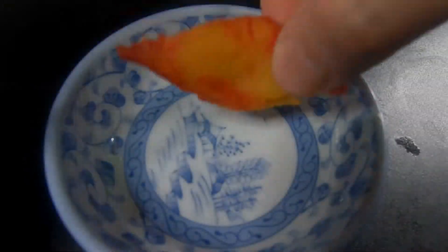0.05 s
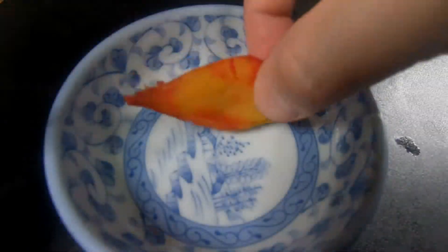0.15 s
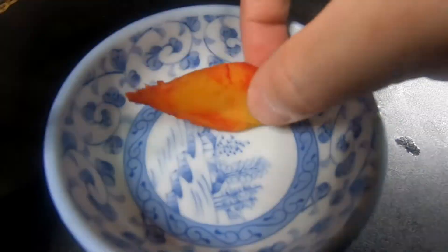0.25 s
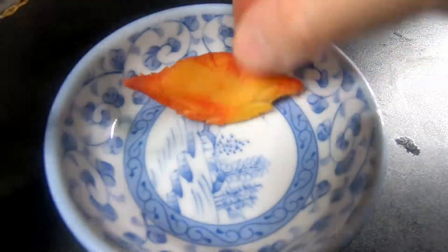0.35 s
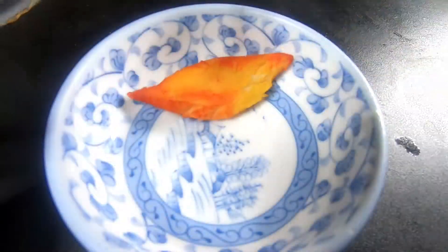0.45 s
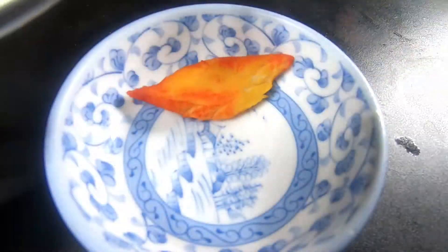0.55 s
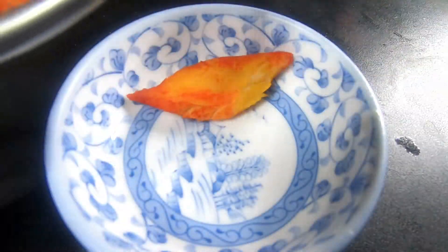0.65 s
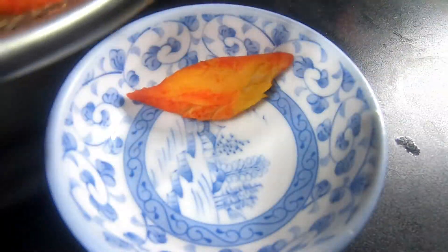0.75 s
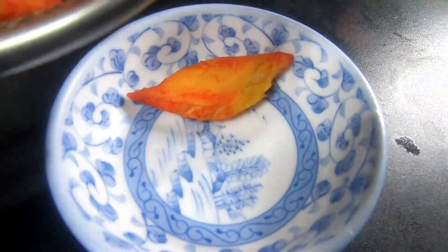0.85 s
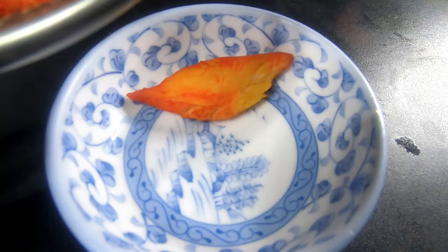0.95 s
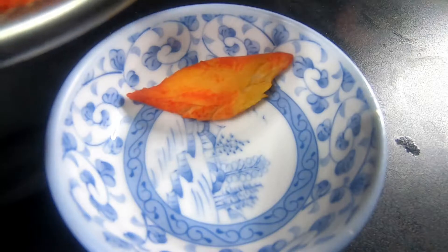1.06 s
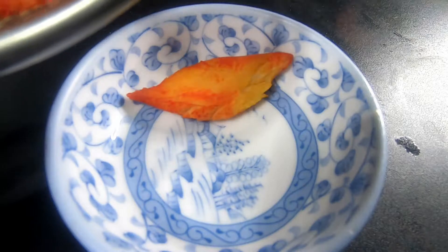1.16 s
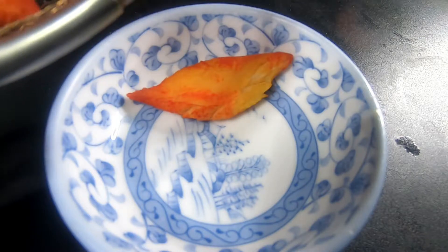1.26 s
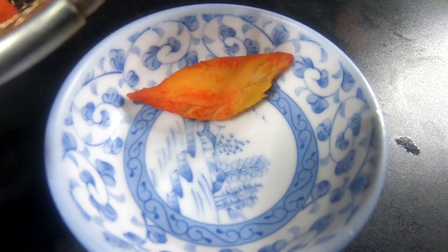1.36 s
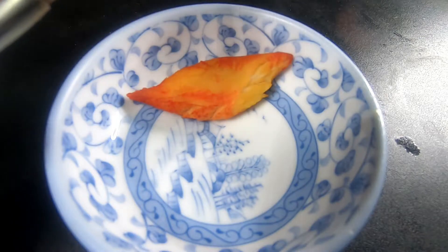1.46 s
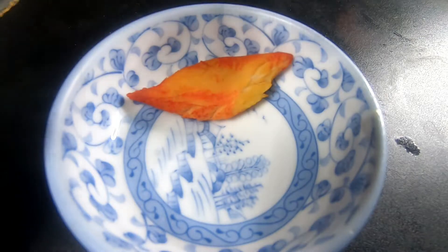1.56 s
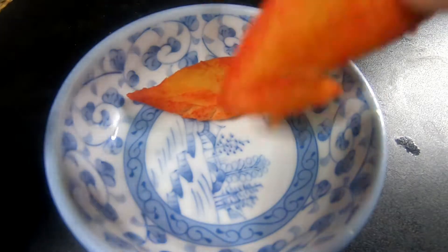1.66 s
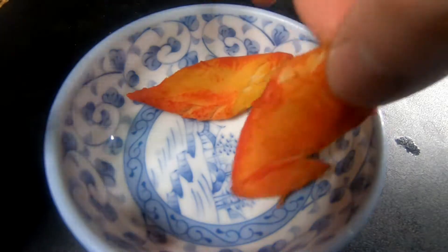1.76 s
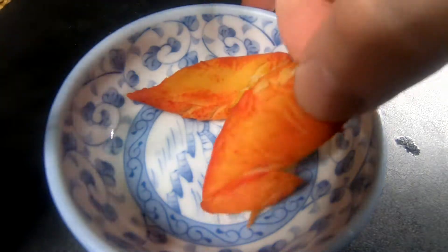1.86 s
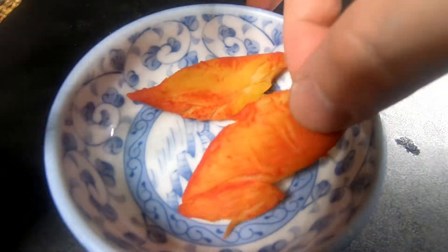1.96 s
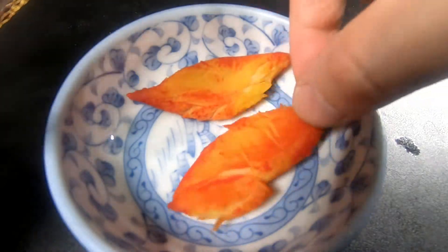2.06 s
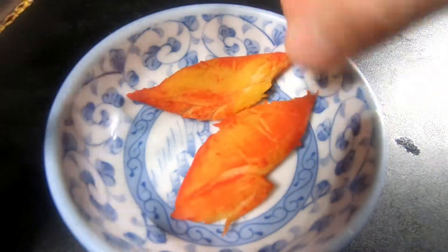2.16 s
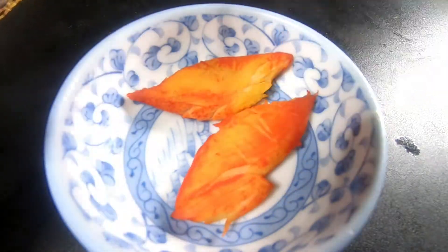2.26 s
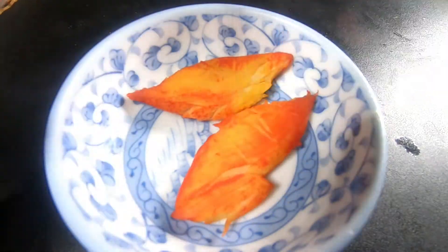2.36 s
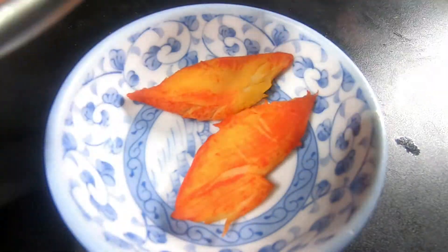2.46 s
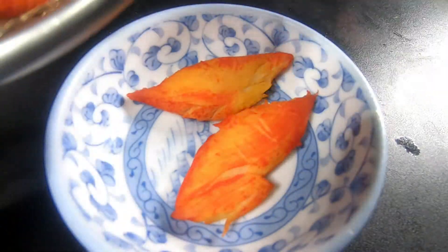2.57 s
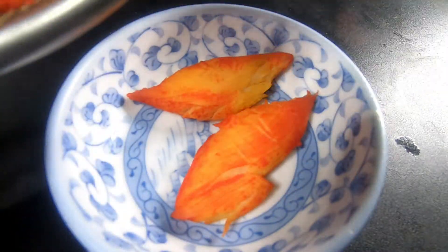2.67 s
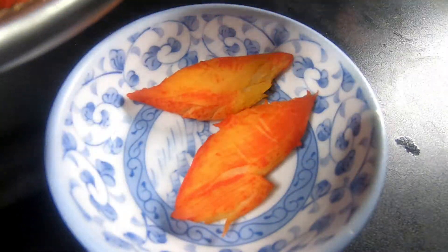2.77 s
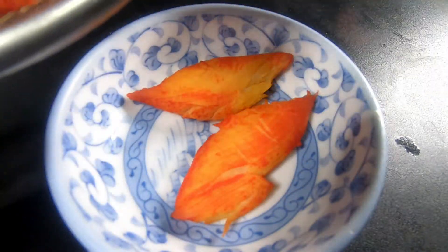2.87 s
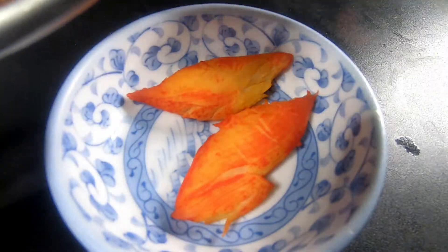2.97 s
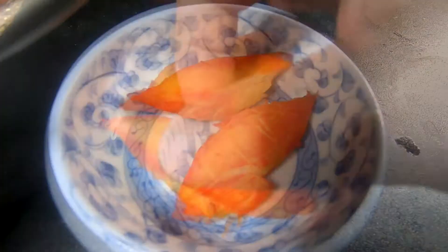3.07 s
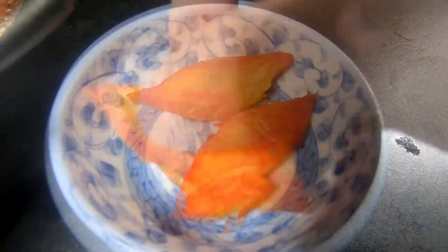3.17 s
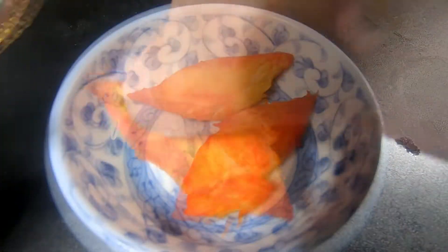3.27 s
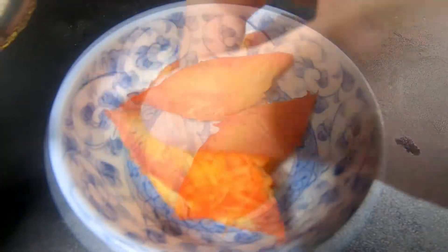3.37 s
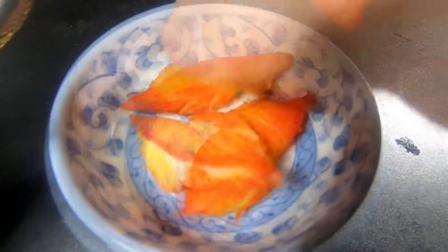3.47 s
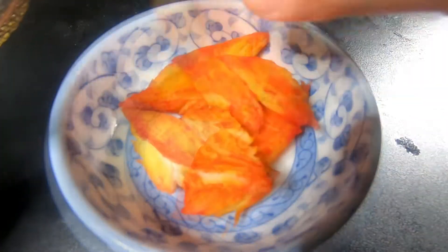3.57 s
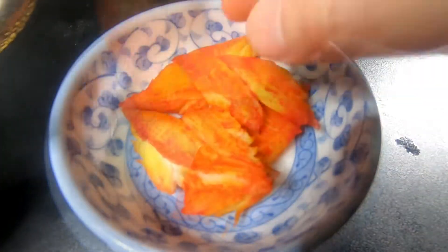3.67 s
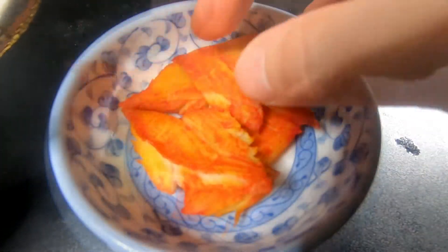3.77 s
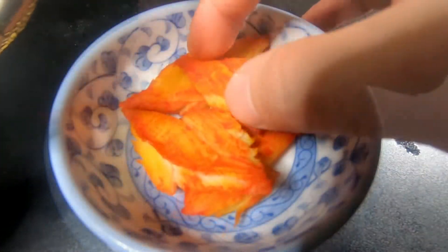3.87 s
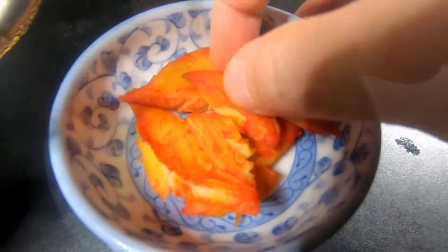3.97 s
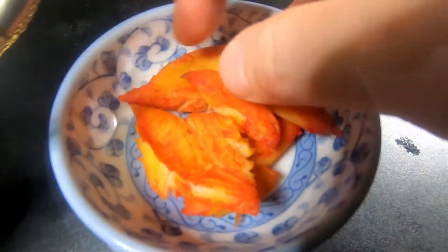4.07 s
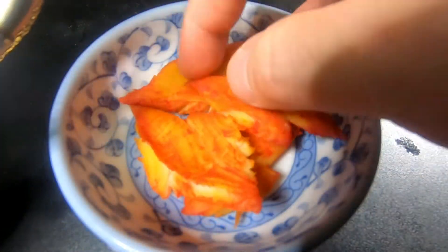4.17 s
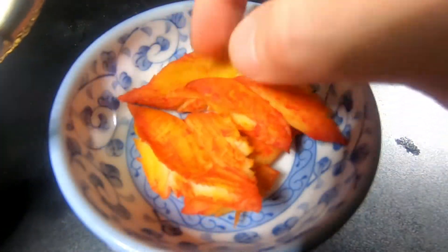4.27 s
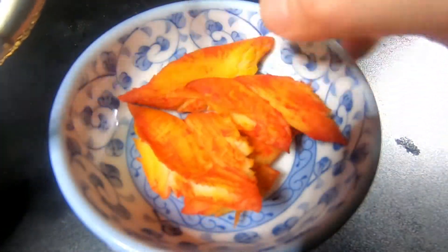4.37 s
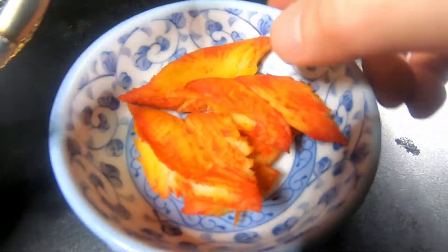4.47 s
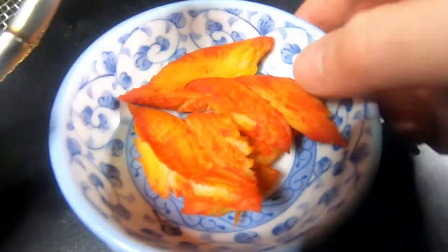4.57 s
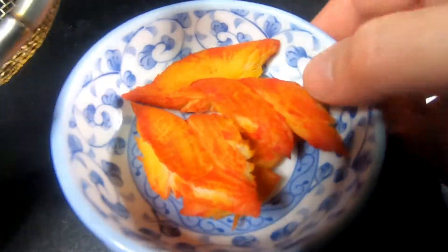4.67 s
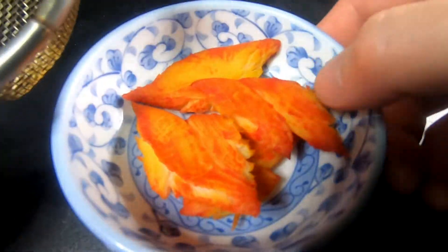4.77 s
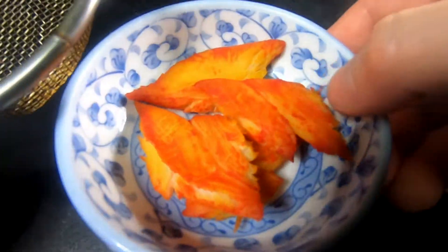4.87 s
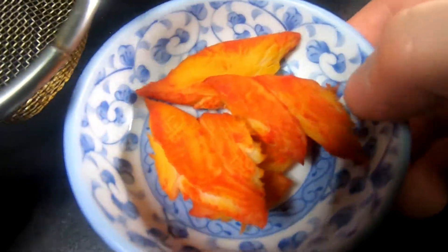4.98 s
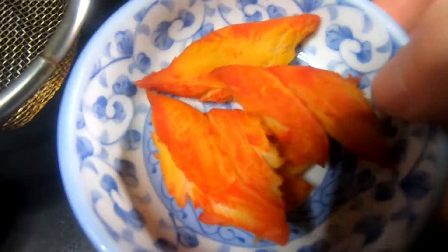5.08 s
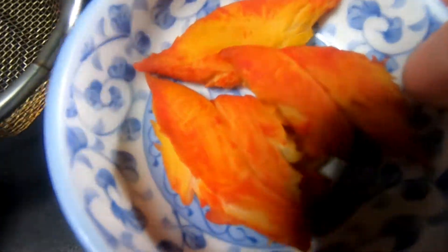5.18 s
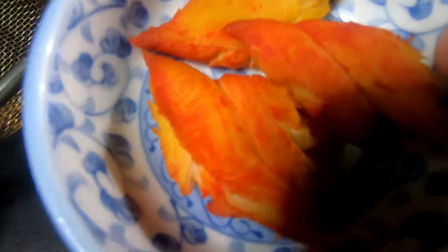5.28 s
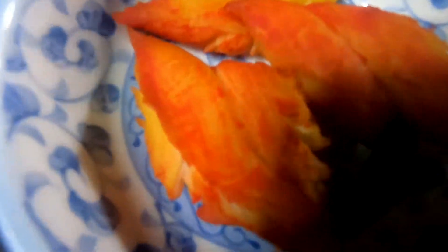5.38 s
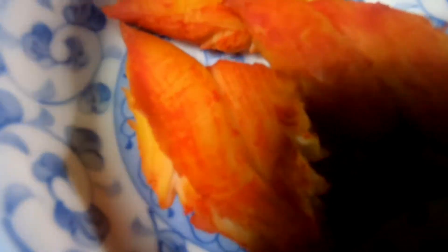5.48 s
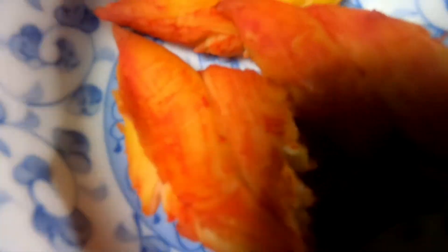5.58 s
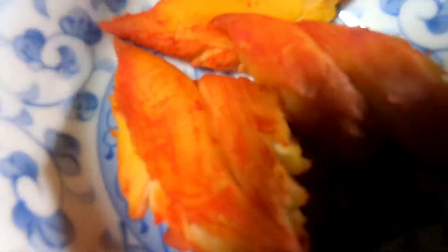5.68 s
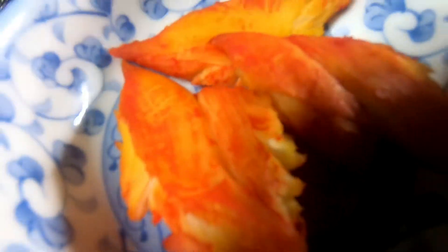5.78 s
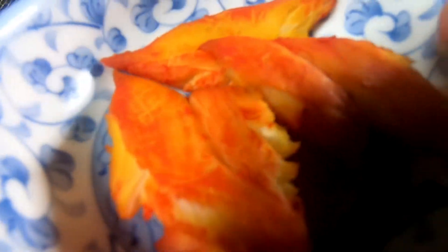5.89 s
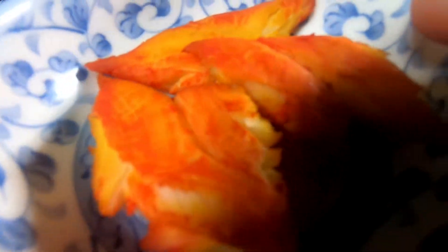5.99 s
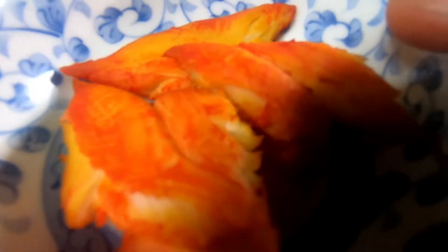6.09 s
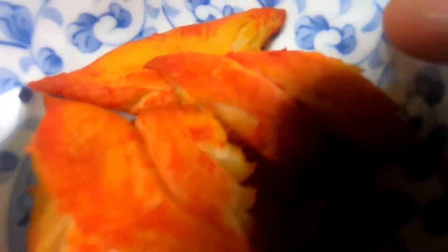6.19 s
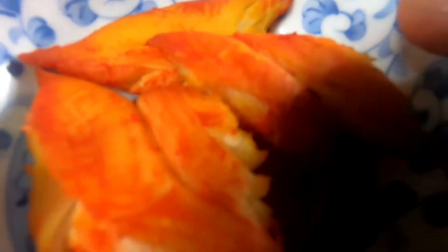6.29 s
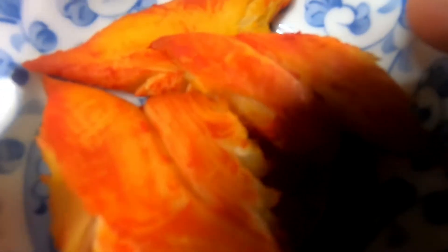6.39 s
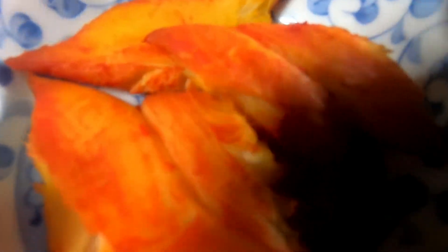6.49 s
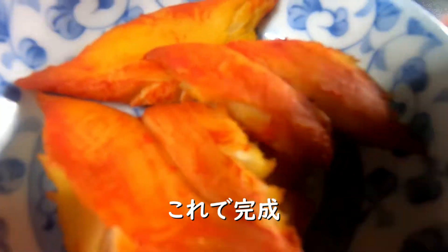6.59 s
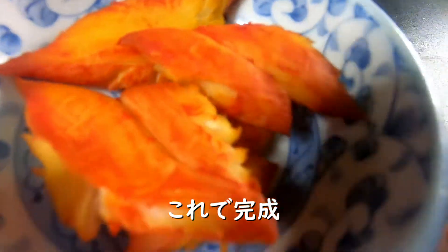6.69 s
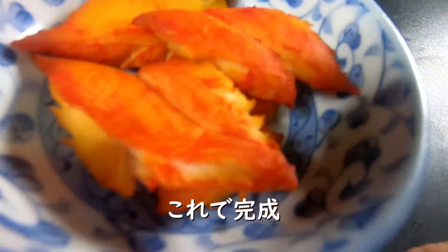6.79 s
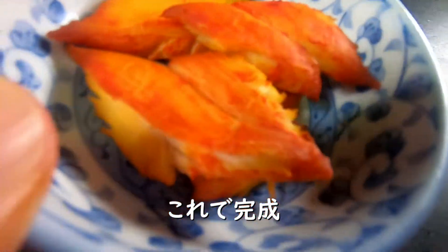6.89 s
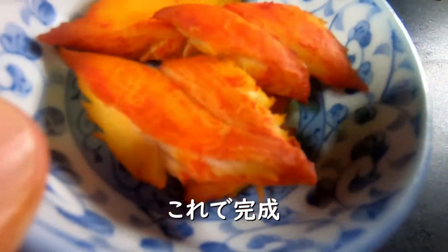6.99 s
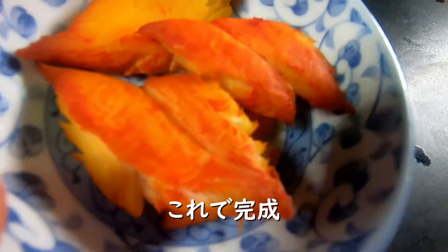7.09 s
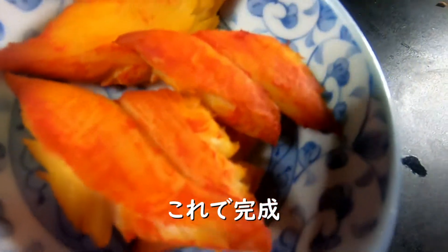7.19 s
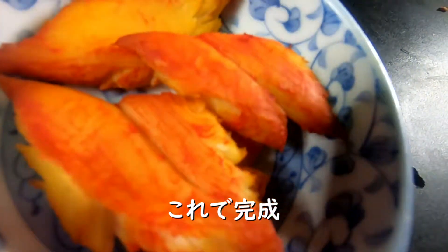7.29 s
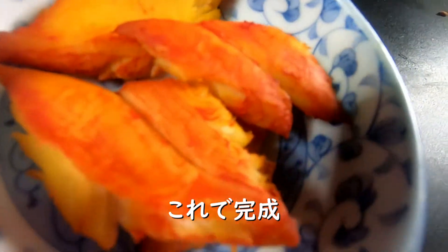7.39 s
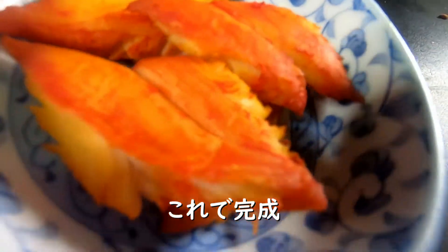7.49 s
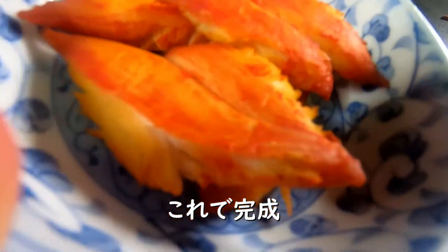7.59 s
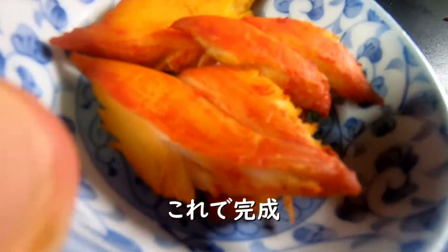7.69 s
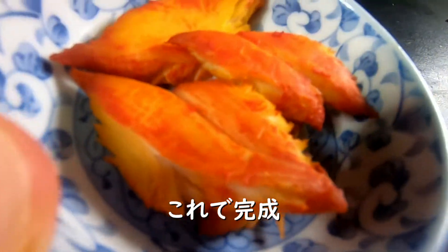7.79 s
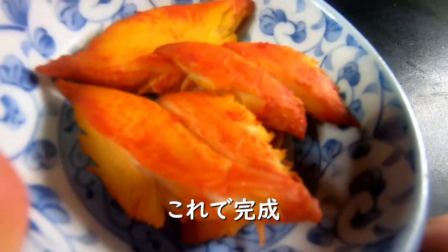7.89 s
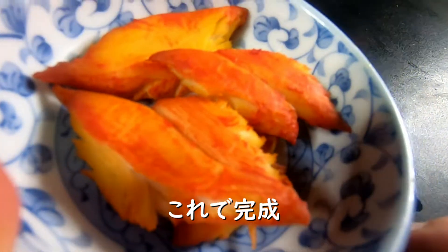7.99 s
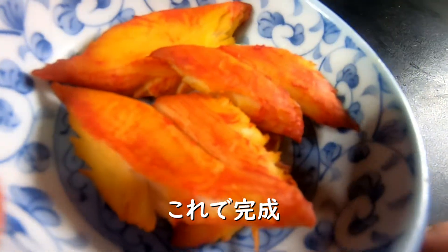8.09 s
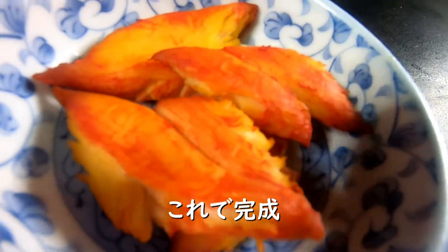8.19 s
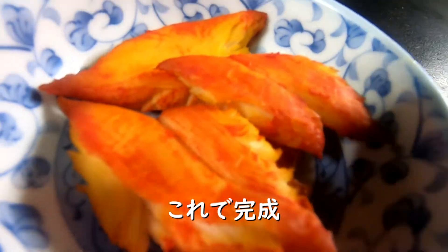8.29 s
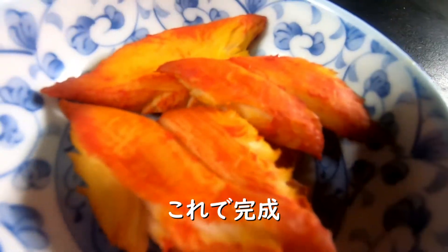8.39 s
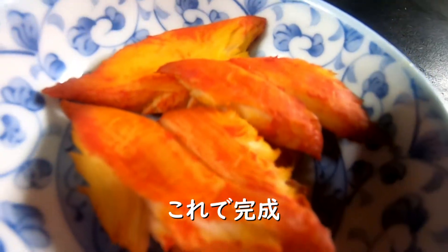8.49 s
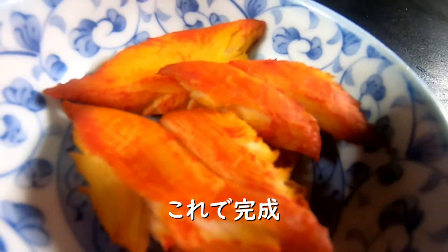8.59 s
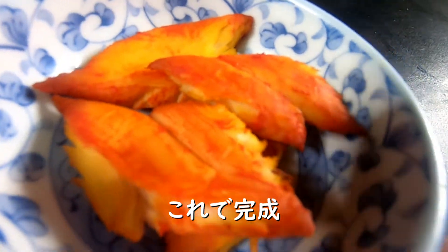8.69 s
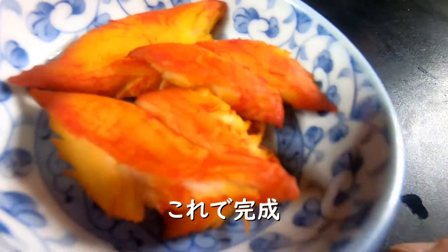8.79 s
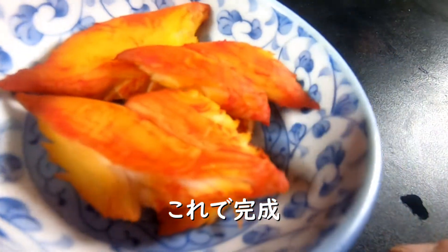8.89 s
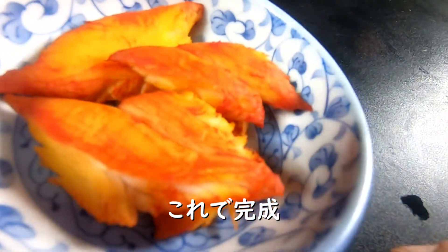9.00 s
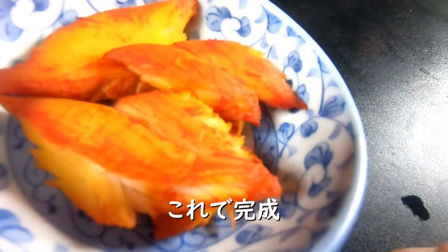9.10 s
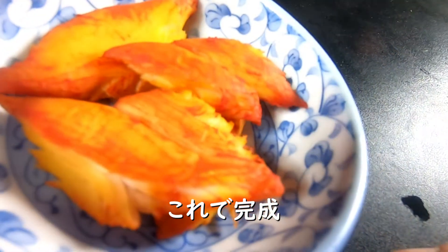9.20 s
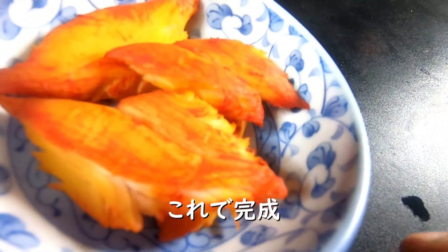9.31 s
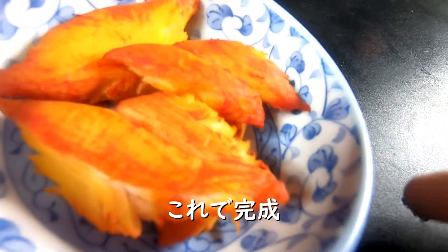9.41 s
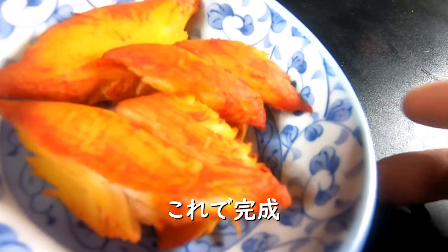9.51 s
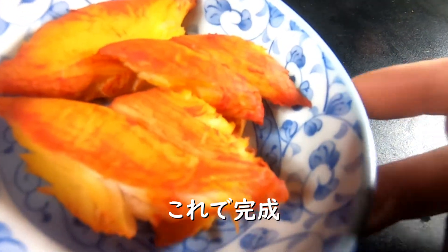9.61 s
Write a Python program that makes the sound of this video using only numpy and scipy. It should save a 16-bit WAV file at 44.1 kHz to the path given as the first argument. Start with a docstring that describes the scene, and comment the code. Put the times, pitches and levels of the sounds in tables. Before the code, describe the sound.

Quiet humming kitchen: muffled food thumps, faint bowl rings and focus-motor whirrs, then close handling knocks, rubs and one heavy bump before near stillness.

```python
"""Kitchen counter, close stereo pair on a hand-held camera, quiet humming room behind.
From the start soft food is laid by hand in a porcelain bowl: dull thumps from decaying notes, with brief focus-motor
whirrs, wet squelches of noise crackle and faint porcelain rings between them. From about 5 s fingers knock and slide
on the casing, whose modes ring near 1.2 kHz, hardest at 7 s, and rock the two microphones against each other.
The room turns duller and louder, the image closes to the centre, then opens again for a last soft blow at 9.5 s."""
import sys
import numpy as np
from scipy import signal
from scipy.fft import rfft, irfft
from scipy.io import wavfile

SR = 44100
rng = np.random.default_rng(int(sys.argv[2]) if len(sys.argv) > 2 else 0)


def digitize_waveform(pressure):
    """Quantize a signal to 16-bit integers and store it at the path in sys.argv[1].

    Rows of a 2-D input are taken as channels; values are limited to [-1, 1].
    """
    field = np.atleast_2d(pressure).T
    bounded = np.clip(field, -1, 1)
    quanta = np.round(bounded * 32767).astype(np.int16)
    wavfile.write(sys.argv[1], SR, quanta)


N = 425565
TIME = np.arange(N) / SR  # s, the whole scene
AGE = np.arange(SR // 3) / SR  # s, since the start of one short sound

# ringing modes of the camera casing: [f/Hz, width/Hz, in-phase level/dB, opposite-phase level/dB]
CASING_MODES = [(505, 39, 1.5, 2), (692, 70, -7.5, -13), (808, 110, -2.5, 4), (1058, 45, -1, 16.5),
                (1202, 68, 4, 15), (1446, 110, 0.5, 5.5), (1590, 95, -1.5, -12), (1756, 42, 0, -1.5),
                (1842, 25, -1, -0.5), (1900, 40, 0, -11.5), (2030, 99, -1.5, -9), (2286, 37, -1.5, -24),
                (2442, 63, -3, -4.5), (2884, 80, -5.5, -11), (3133, 63, -3, -4), (3480, 480, -13.5, -18),
                (4160, 190, -10.5, -26.5), (4920, 630, -20, -29), (6300, 900, -32, -31)]


def undb(db):
    """Decibels to gain."""
    return 10 ** (np.asarray(db) / 20)


def unit(x):
    """Scale to rms 1."""
    return x / np.sqrt(np.mean(x ** 2))


def add(out, s, x):
    """Mix a short sound in at time s."""
    i = max(int(s * SR), 0)
    out[:, i:i + x.shape[-1]] += x[..., :N - i]


def band(x, lo_hz, hi_hz, order=2):
    """Band-pass."""
    sos = signal.butter(order, [lo_hz, min(hi_hz, SR / 2 - 1)], "band", fs=SR, output="sos")
    return signal.sosfilt(sos, x)


def stereo(mid, side):
    """Left and right microphones from the in-phase and opposite-phase parts."""
    return np.array([mid + side, mid - side])


def decay(age, t60):
    """Exponential fall by 60 dB in t60 seconds."""
    return np.exp(-np.log(1000) * age / t60)


def damped(hz, t60):
    """One freely decaying mode."""
    return np.sin(2 * np.pi * hz * AGE) * decay(AGE, t60)


def walk(rate):
    """Random wander through `rate` new values a second, spread near 1."""
    knots = rng.standard_normal(int(N / SR * rate) + 2)
    return np.interp(TIME * rate, np.arange(len(knots)), knots)


def coloured(points):
    """Noise of rms 1 with the given spectrum."""
    hz, db = np.transpose(points)
    freq = np.maximum(np.arange(N // 2 + 1) * SR / N, 1)
    gain = undb(np.interp(np.log(freq), np.log(hz), db))
    return unit(irfft(rfft(rng.standard_normal(N)) * gain, N))


def resonate(force, modes, roam_db=0, count=12):
    """A force rings the modes, with signs alternating between them; returns mid and side.
    A contact that travels drives now one mode, now another, by roam_db."""
    mid = side = 0
    place = np.linspace(0, count - 1, len(force))
    for k, (hz, width_hz, mid_db, side_db) in enumerate(modes):
        reach = undb(roam_db * np.interp(place, np.arange(count), rng.standard_normal(count)))
        ring = signal.lfilter(*signal.iirpeak(hz, hz / width_hz, fs=SR), force * reach)
        mid = mid + (-1) ** k * undb(mid_db) * ring
        side = side + (-1) ** (k // 2) * undb(side_db) * ring
    return mid, side


def slips(size, rate, spread_db):
    """Stick-slip friction: dense tiny clicks, a few much larger than the rest."""
    strength = undb(spread_db * np.minimum(rng.exponential(size=size), 4))
    return (rng.random(size) < rate / SR) * strength * rng.standard_normal(size)


def grit(force, lo_hz=4200, hi_hz=8800):
    """The thin top of a contact, from one force for each microphone; a little stronger on the right."""
    return band(force, lo_hz, hi_hz) * undb([[0], [3]])


def stroke(age, length_s, release_s, grip_share=0.097):
    """Envelope of one slide: take hold over a share of its length, slide, let go (release as t60)."""
    hold = 1 - np.exp(-age / (grip_share * length_s))
    return hold * decay(np.maximum(age - length_s, 0), release_s)


def strike(modes, grit_db, chatter_s, rock_db, soft_hz, chatter_db=-15):
    """One contact: a click and brief chatter into the modes, dulled by soft skin above soft_hz."""
    force = undb(chatter_db) * rng.standard_normal((3, len(AGE))) * np.exp(-AGE / chatter_s)
    force[:, 0] = 1  # the click
    push = signal.sosfilt(signal.butter(2, soft_hz, fs=SR, output="sos"), force[0])
    parts = (*resonate(push, modes), grit(force[1:]))
    mid, side, top = (x / np.abs(x).max() for x in parts)
    return stereo(mid, side * undb(rock_db)) + undb(grit_db) * top


def kitchen(mid_db=-68.5, side_db=-70.5, late_db=-63.5, waver_db=1.5, turn_s=(6.0, 7.8)):
    """Room air as shaped noise with a low, wavering hum; its in-phase part turns duller and louder over turn_s."""
    # spectra of the air, in phase, in opposite phase, and late in phase: [f/Hz, relative density/dB]
    air = [(18, -38), (30, 1.5), (64, -13.5), (103, -12), (128, -12.5), (168, 5), (350, -8.5), (482, -18.5),
           (573, -21), (632, -10), (1090, -20), (2110, -22.5), (2970, -23), (6690, -29), (10700, -33.5),
           (13900, -51), (22000, -120)]
    air_side = [(18, -36.5), (30, -12), (108, -13), (152, -6.5), (261, -4), (459, -14.5), (573, -14),
                (829, -7.5), (1030, -13.5), (2900, -28), (5780, -31.5), (7390, -31), (10700, -35),
                (13900, -59.5), (22000, -120)]
    late_air = [(18, -42.5), (30, -9.5), (108, -15.5), (156, 1), (274, -2), (471, -19), (770, -13.5),
                (1030, -22.5), (1230, -21.5), (4630, -29.5), (5370, -48.5), (8350, -41), (10700, -48.5),
                (13900, -96), (22000, -120)]
    late = np.interp(TIME, turn_s, [0, 1])
    early_part = undb(mid_db) * (1 - late) * coloured(air)
    mid = early_part + undb(late_db) * late * coloured(late_air)
    hum_change = band(mid, 84, 360) * (undb(2 * waver_db * walk(5.2)) - 1)
    return stereo(mid + hum_change, undb(side_db) * coloured(air_side))


def walls(x, wet_db=-20, t60=0.24):
    """The short tail of a small room: decaying noise, different at each microphone."""
    tail = band(rng.standard_normal((2, len(AGE))), 130, 4700) * decay(AGE, t60)
    tail /= np.sqrt(np.sum(tail ** 2, axis=1, keepdims=True))
    return x + undb(wet_db) * signal.fftconvolve(x, tail, axes=1)[:, :N]


def lens(sag=0.13, flutter_db=4, tone_db=-4, whine_hz=10080, whine_db=-91, whine_fade_s=(7.5, 8.1)):
    """The focus motor whirrs, its fluttering whistle rising and falling with speed; a thin whine fades late."""
    # refocusing runs: [t/s, length/s, whirr level/dB, whistle level/dB, nominal top whistle f/Hz]
    runs = [(0.724, 0.5, -80, -78, 8850), (1.49, 0.35, -84.5, -81, 8360), (3.205, 0.47, -79, -87, 9200),
            (4.981, 0.41, -70.5, -77, 9700), (5.96, 0.41, -68, -69, 11250),
            (7.992, 0.47, -65.5, -80.5, 11030)]
    whine = unit(band(rng.standard_normal((2, N)), whine_hz * .99, whine_hz * 1.01))
    out = undb(whine_db) * whine * np.interp(TIME, whine_fade_s, [1, 0])
    for s, length_s, whirr_db, whistle_db, hz in runs:
        count = int(length_s * SR)
        speed = 1 - sag * np.linspace(-1, 1, count) ** 2
        pitch_hz = hz * speed * (1 + .011 * walk(600)[:count])
        whistle = np.sin(2 * np.pi * np.cumsum(pitch_hz) / SR)
        whistle = whistle * undb(tone_db + flutter_db * walk(39)[:count])
        whirr = unit(band(rng.standard_normal(count), 1550, 4140, order=4))
        motor = undb(whirr_db) * whirr + undb(whistle_db) * whistle
        add(out, s, motor * signal.windows.tukey(count, .5))
    return out


def squelches(spread_db=4.5):
    """Moist fibres part: tiny wet films snap in a short swell of band-passed crackle."""
    # wet partings: [t/s, length/s, level/dB, centre f/Hz]
    partings = [(0.906, 0.09, -75.5, 8400), (1.011, 0.043, -71.5, 6500), (1.327, 0.01, -72.5, 6860),
                (1.358, 0.054, -70, 6700), (1.448, 0.033, -68, 6900), (1.778, 0.01, -70, 7100),
                (2.442, 0.13, -74, 7100), (2.756, 0.11, -69.5, 8150), (2.868, 0.099, -64.5, 7900),
                (3.207, 0.012, -70, 7600), (3.241, 0.013, -64, 4630), (3.261, .007, -68, 5330),
                (4.049, 0.031, -66, 3300), (8.417, 0.05, -70.5, 3370), (8.708, 0.11, -73.5, 2945)]
    out = np.zeros((2, N))
    for s, length_s, db, hz in partings:
        count = int(length_s * SR)
        snaps = rng.standard_normal((2, count)) * undb(spread_db * rng.exponential(size=count))
        mid, side = unit(band(snaps, hz * 0.78, hz * 1.23)) * signal.windows.tukey(count, .6)
        add(out, s, undb(db) * stereo(mid, 0.93 * side))
    return out


def bowl(t60=0.12):
    """Porcelain rings faintly, damped by the food in it; the ring swells for as long as skin or food rubs it."""
    # touches and strokes of the bowl: [t/s, level/dB, contact time/s]
    contacts = [(1.893, -72, 0.0032), (2.135, -61.5, .012), (2.162, -64, .05), (4.598, -69, 0.033),
                (4.851, -61, .06), (6.315, -60, .035), (6.409, -59.5, 0.018), (6.608, -49.5, 0.064)]
    # porcelain modes: [f/Hz, peak level/dB]
    modes = [(2540, -3.5), (6080, -9.5), (9450, -19), (10550, -26)]
    out = np.zeros((2, N))
    for s, db, contact_s in contacts:
        force = rng.standard_normal(len(AGE)) * AGE * (AGE < contact_s)
        for hz, mode_db in modes:
            ring = signal.fftconvolve(force, damped(hz, t60))[:len(AGE)]
            add(out, s, undb(db + mode_db) * ring / np.abs(ring).max())
    return out


def touches(level_db=-1, grit_db=-23.0, rock_db=4, soft_hz=6000):
    """Fingers and food meet the bowl and ring the counter modes; all rock the camera alike."""
    # contacts in the bowl: [t/s, level/dB, relative treble/dB, chatter time constant/s]
    contacts = [(0.372, -47.5, 0, .018), (.429, -43, -2, 0.0054), (.450, -41.5, -8, 0.0033),
                (.518, -48, 17, 0.008), (.549, -31.5, -7, 0.0044), (.579, -40, -6, .0054),
                (.612, -44, -9, 0.003), (.638, -49.5, -15, 0.018), (2.172, -49, 17, 0.0043),
                (3.1975, -49, 12, 0.027), (3.4807, -34.5, -16, 0.0072), (3.521, -52, -4, 0.016),
                (3.614, -49, 8, 0.022), (4.111, -56, 6, 0.0051), (4.381, -39, -14, 0.0053),
                (4.420, -51.5, -6, 0.0074), (4.741, -38.5, -14, 0.031), (4.868, -53, -2, .007),
                (4.917, -33.5, 5, .004), (4.952, -30.5, -2, 0.008)]
    # counter modes under the bowl: [f/Hz, width/Hz, in-phase level/dB, opposite-phase level/dB]
    counter = [(313, 38, 12, 2), (583, 14, 6.5, 6), (704, 43, 2, 9.5), (933, 177, 1, 13.5),
               (1077, 324, -2.5, 5.5), (1307, 235, 1, 10), (1360, 160, 2.5, -3), (1565, 440, -4.5, -3),
               (2300, 160, -13.5, -16.5), (2520, 190, -9.5, -14), (3920, 1700, -23.5, -33)]
    out = np.zeros((2, N))
    for s, db, treble_db, chatter_s in contacts:
        contact = strike(counter, grit_db + treble_db, chatter_s, rock_db, soft_hz)
        add(out, s, undb(db + level_db) * contact)
    return out


def thumps(level_db=1, push_s=0.0073, right_ratio=0.905, overtone_hz=340, overtone_db=-9, overtone_t60=.05):
    """Soft blows push slowly: a dull note with a short overtone, then the lower sway of counter and camera."""
    # soft blows: [t/s, relative level/dB, note f/Hz, relative sway/dB]
    blows = [(0.433, -26.5, 183, -3.5), (.52, -18, 145, -4.5), (.553, -21.5, 217, -26),
             (.583, -23, 150, -3.5), (.619, -30, 115, 0.5), (.648, -27, 103, -5.5), (1.892, -41.5, 173, -8),
             (1.987, -45, 171, -9), (2.135, -41.5, 263, -1), (2.171, -28, 166, -4.5),
             (3.076, -51.5, 243, -9), (3.194, -41, 176, -6), (3.478, -38.5, 239, 5),
             (3.522, -33.5, 206, -3), (3.611, -37, 174, 0), (3.672, -32.5, 148, 1), (3.706, -40, 109, 3.5),
             (4.112, -50, 162, -8), (4.3, -59.5, 159, 11), (4.389, -38, 117, 5), (4.738, -38, 236, 3.5),
             (4.953, -22, 163, -32.5), (4.967, -23.5, 234, -7), (5.072, -25.5, 154, -4),
             (5.756, -32, 200, -23), (6.301, -46, 246, -5), (6.981, -18, 209, 6.5), (7.005, -8.5, 186, -6),
             (7.03, -14, 181.5, -3), (7.139, -13, 106, -14), (7.636, -26.5, 177, -10), (7.64, -22, 61, -9),
             (9.506, -25, 450, -23), (9.516, -24, 451, -24)]
    # sway modes: [f/Hz, t60/s, left level/dB, right level/dB]
    sway_modes = [(151.4, 0.26, -7, -25), (114.9, 0.26, -15, -10), (90, 0.19, -17.5, -9.5)]
    # the harder the finger presses, the sooner a blow dies
    pressed_t60_s, doubling_db = 0.035, 26  # t60 at 0 dB in the table, and the dB of lightness that double it
    out = np.zeros((2, N))
    sway = sum(undb([[left_db], [right_db]]) * damped(hz, t60) for hz, t60, left_db, right_db in sway_modes)
    overtone = undb(overtone_db) * damped(overtone_hz, overtone_t60)
    push = 1 - np.exp(-AGE / push_s)
    for s, db, hz, sway_db in blows:
        t60 = pressed_t60_s * 2 ** (-db / doubling_db)
        # the lowest notes twist the camera most: the microphones start together and drift apart
        right_hz = hz * right_ratio if hz < sway_modes[0][0] * 1.2 else hz
        note = np.array([damped(hz, t60), damped(right_hz, t60)])
        add(out, s, undb(db + level_db) * push * (note + overtone + undb(sway_db) * sway))
    return out


def jolts(left_db=-17, push_s=0.013, swings=14.9):
    """The camera lurches in the hand and settles in the same number of deep swings, mostly at the right mic."""
    # lurches: [t/s, level on the right/dB, f/Hz]
    lurches = [(.54, -27.5, 47.5), (2.192, -35.5, 47.8), (3.68, -29, 62), (4.389, -40.5, 45),
               (6.066, -31, 41), (6.716, -32.5, 38.8), (6.984, -11.5, 35.5), (7.03, -17, 73.6),
               (7.12, -17, 58)]
    out = np.zeros((2, N))
    push = 1 - np.exp(-AGE / push_s)
    for s, db, hz in lurches:
        add(out, s, undb([[db + left_db], [db]]) * damped(hz, swings / hz) * push)
    return out


def rubs(scrape_db=-1, groan_db=-2, grit_db=-2, rumble_db=-9, uneven_db=0.83, groan_width_hz=30,
         squeak_width_hz=70, spread_db=1.0, roam_db=3):
    """Skin slides on bowl and casing: slips drive casing and body, with a groan and a squeak; the grip wavers."""
    # strokes: [t/s, length/s, scrape level/dB, groan level/dB, relative treble/dB, casing rock/dB,
    #           groan f/Hz, groan tone/dB, squeak f/Hz, squeak tone/dB]
    strokes = [(0.368, 0.093, -59, -50, -17, 0, 276, 13, 1410, 7),
               (.535, 0.11, -67, -45.5, -6.5, 6, 276, 16, 1390, 5),
               (4.749, 0.062, -62, -48, -31, 0, 283, 8, 1840, -6),
               (4.925, .12, -57, -47.5, -11.5, 4.5, 283, 14, 1570, 5),
               (5.061, 0.05, -61.5, -40.5, -7, -1, 246, -1, 1840, 2),
               (5.428, 0.19, -70, -49, -34, -1, 202, 15.5, 880, 14),
               (5.587, .17, -52.5, -41.5, -27, 0.5, 197, 0, 703, 14.5),
               (5.876, 0.015, -64.5, -51.5, -28, 1, 207, 8, 890, 14),
               (5.957, 0.079, -60.5, -51, -11, 5, 493, 3.5, 1360, 1),
               (6.033, 0.0095, -45.5, -37, -16, 3, 493, 15.5, 1460, 8),
               (6.09, 0.2, -63.5, -58, -9, -2.5, 262, 6, 1350, 4),
               (6.456, 0.15, -67, -68, -9.5, -1, 298, 6, 1300, -2),
               (6.688, 0.054, -44, -48.5, -10.5, -1, 162, 15, 1370, 4.5),
               (6.971, 0.042, -33.5, -25.5, -11, 2.5, 171, 2.5, 2200, 0.5),
               (7.105, 0.042, -47, -41, -9, 5, 170, -11, 1990, 9),
               (7.152, 0.42, -37, -33.5, -14.5, -2.5, 480, 7, 1820, 3.5),
               (7.648, 0.13, -52, -53.5, -14, -8, 345, 4, 1220, 9),
               (7.802, 0.042, -49, -49, -14, -1, 345, -1, 1240, 0),
               (7.873, 0.088, -53.5, -51, -13, 1, 345, 9, 1160, 9.5),
               (9.501, 0.054, -49, -47, -16.5, -4, 352, 7, 1930, -4)]
    # low modes of the camera body: [f/Hz, width/Hz, in-phase level/dB, opposite-phase level/dB]
    body = [(204, 57, 2.5, -10.5), (325.3, 50, 0, -3.5), (378, 50, 1, -42), (501.7, 9.8, 2, -25.5)]
    scrape_release_s, groan_release_s = 0.15, .21
    # the firmer the stroke, the denser its slips: rate at the firm level, and the dB that double it
    slips_per_s, firm_db, slip_doubling_db = 2200, -40, 12.5
    out, age = np.zeros((2, N)), TIME[:2 * len(AGE)]
    size = len(age)
    for s, length_s, slide_db, low_db, treble_db, rock_db, groan_hz, tone_db, squeak_hz, squeak_db in strokes:
        scrape = undb(slide_db) * stroke(age, length_s, scrape_release_s)
        groan = undb(low_db) * stroke(age, length_s, groan_release_s)

        squeak_mode = (squeak_hz, squeak_width_hz, squeak_db, squeak_db - 3.5)
        rate = slips_per_s * 2 ** ((slide_db - firm_db) / slip_doubling_db)
        mid, side = resonate(slips(size, rate, spread_db), CASING_MODES + [squeak_mode], roam_db)
        ringing = stereo(mid, side * undb(rock_db)) / mid.std()

        groan_mode = (groan_hz, groan_width_hz, tone_db, tone_db - 28.0)
        low = resonate(slips(size, 900, .8), body + [groan_mode])
        low = unit(band(stereo(*low), 140, 610, order=4))
        hiss = unit(grit(np.array([slips(size, 6500, 1.4) for _ in range(2)])))

        # only a firm grip shakes the whole camera, mostly at the right microphone
        firmness = np.minimum(groan / undb(-35.5), 1) ** 3
        rumble = unit(band(rng.standard_normal(size), 25, 105)) * undb([[-12], [0]]) * firmness

        upper = scrape * (undb(scrape_db) * ringing + undb(grit_db + treble_db) * hiss)
        lower = groan * (undb(groan_db) * low + undb(rumble_db) * rumble)
        add(out, s, upper + lower)
    return out * undb(uneven_db * walk(70))


def knocks(grit_db=-15, chatter_s=0.0033, soft_hz=3400):
    """Fingertips strike the casing and ring its modes, each with the same brief chatter."""
    # finger knocks: [t/s, level/dB, relative treble/dB, camera rock/dB]
    hits = [(4.9984, -44.5, 13, -5), (5.02, -37, 0, 4), (5.428, -55.5, -8, 2), (5.591, -41, 6, 0),
            (5.617, -52, -9.5, 4), (5.695, -40.5, 0, -2), (5.7197, -35, -1, 0), (5.746, -42, 6, -7),
            (5.95, -43, -10, 2), (5.9941, -39.5, -14, -5), (6.041, -34.5, -8, -9), (6.118, -52, -3.5, -2),
            (6.205, -47.5, -4, -10), (6.239, -50, 2, -3), (6.574, -41.5, -8, 7), (6.700, -40.5, 0, 11),
            (6.964, -36, 9.5, 11), (6.98, -27.5, -0.5, 8.5), (6.9882, -18.5, 13, -2),
            (7.002, -22, 7.5, 5.5), (7.0204, -14, -4.5, 5.5), (7.117, -32, 7, -8), (7.135, -23, -9, 9),
            (7.337, -28.5, -10, 7), (7.3875, -24.5, -17, -1), (7.657, -39, 6, 7.5), (7.81, -43, 11, -4),
            (7.825, -37, 1, -7)]
    out = np.zeros((2, N))
    for s, db, treble_db, rock_db in hits:
        add(out, s, undb(db) * strike(CASING_MODES, grit_db + treble_db, chatter_s, rock_db, soft_hz))
    return out


def scene():
    """Food and bowl heard with the room's tail; handling, motor and air reach the microphones without it."""
    food = walls(touches() + thumps() + bowl() + squelches())
    handling = knocks() + rubs() + jolts()
    return food + handling + lens() + kitchen()


def record(dry, knee_hz=10700, leak_db=-15, top_hz=14200):
    """The stereo width changes; the treble steps down above a knee and is then cut above top_hz."""
    # the image closes to the centre and opens again: [t/s, side gain/dB]
    width = [(7.3, 1), (7.52, -8), (7.66, -14), (7.9, -27), (8.1, -37), (9.35, -32), (9.52, -6.5),
             (9.65, -12)]
    side = (dry[0] - dry[1]) / 2 * undb(np.interp(TIME, *np.transpose(width)))
    sound = stereo(dry.mean(axis=0), side)
    below = signal.sosfiltfilt(signal.butter(12, knee_hz, fs=SR, output="sos"), sound)
    sound = below + undb(leak_db) * (sound - below)
    return signal.sosfilt(signal.ellip(8, .2, 70, top_hz, fs=SR, output="sos"), sound)


dry = scene()
out = record(dry)
digitize_waveform(out)
```